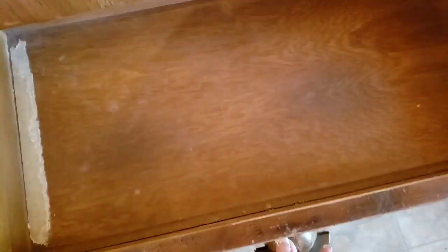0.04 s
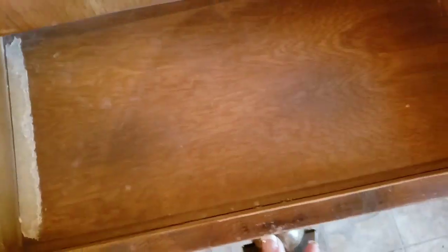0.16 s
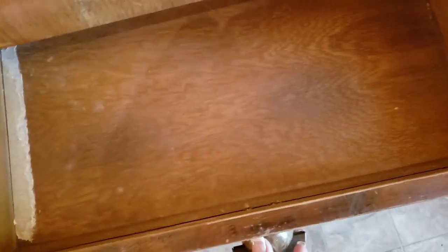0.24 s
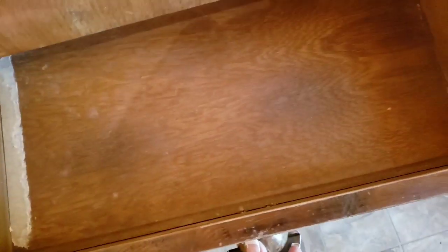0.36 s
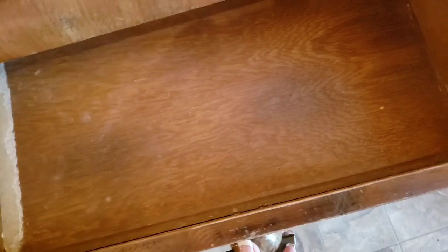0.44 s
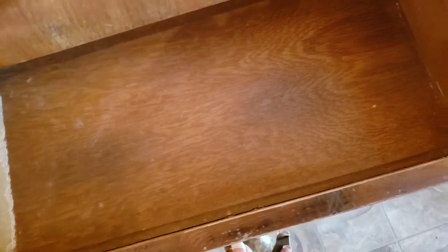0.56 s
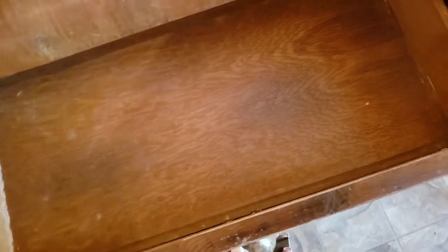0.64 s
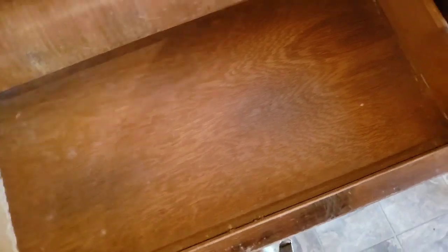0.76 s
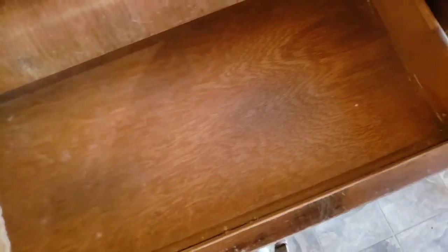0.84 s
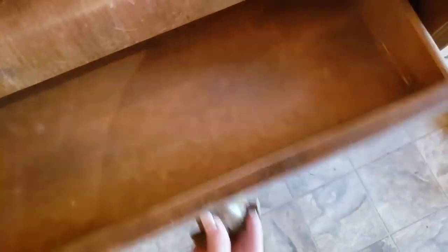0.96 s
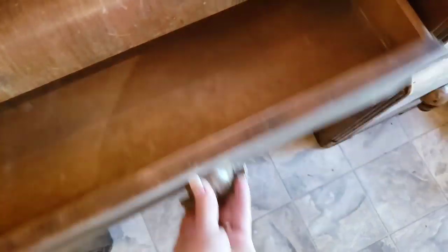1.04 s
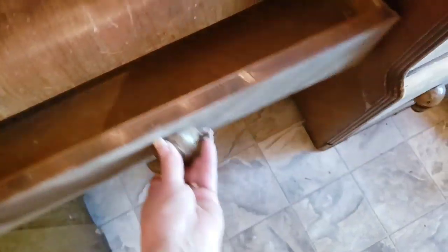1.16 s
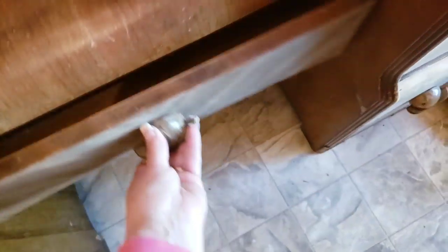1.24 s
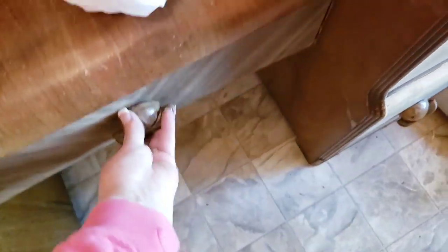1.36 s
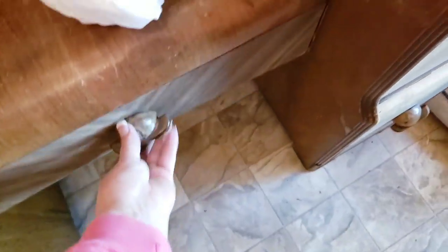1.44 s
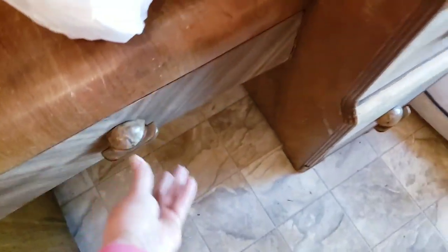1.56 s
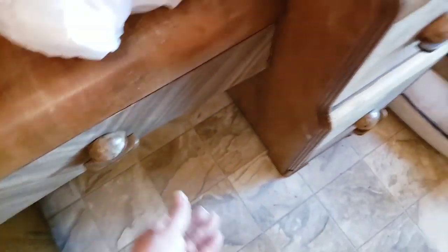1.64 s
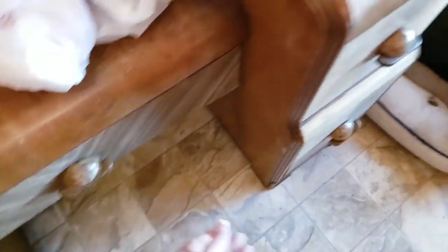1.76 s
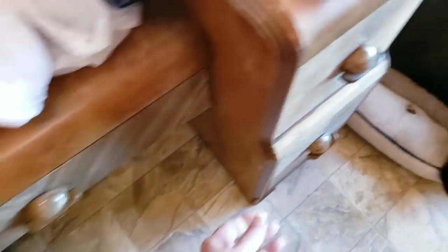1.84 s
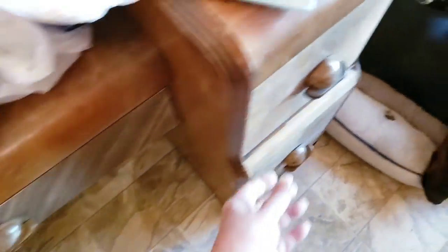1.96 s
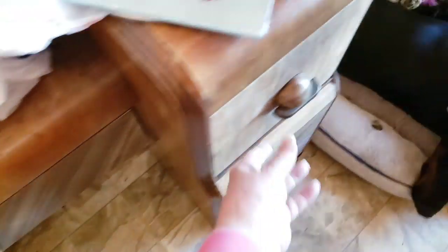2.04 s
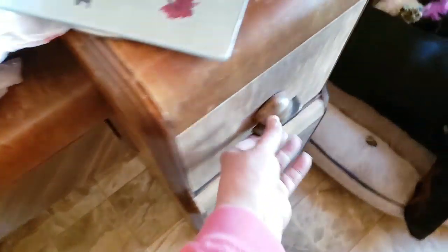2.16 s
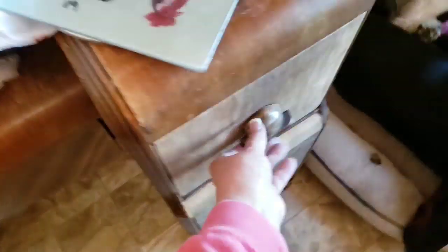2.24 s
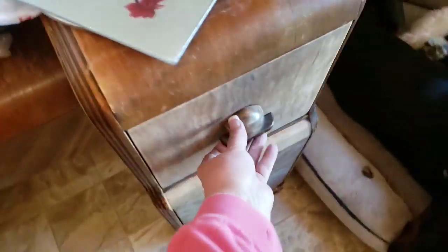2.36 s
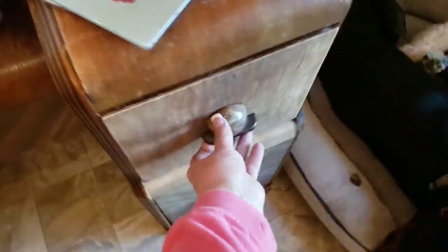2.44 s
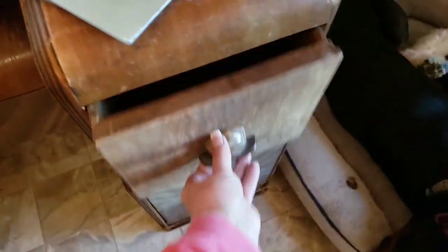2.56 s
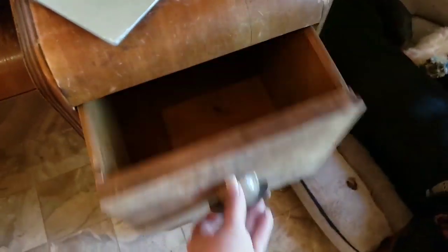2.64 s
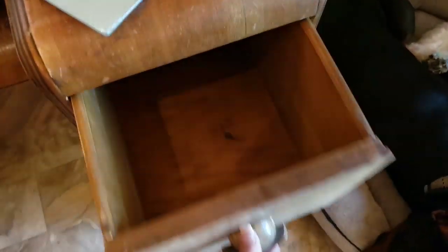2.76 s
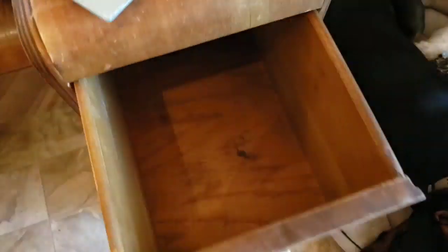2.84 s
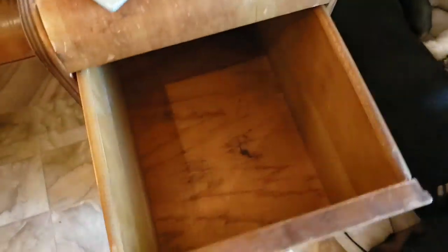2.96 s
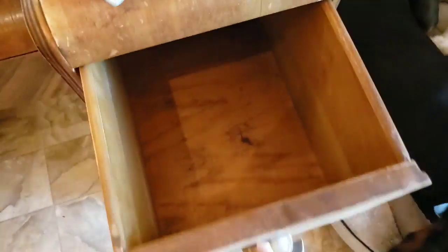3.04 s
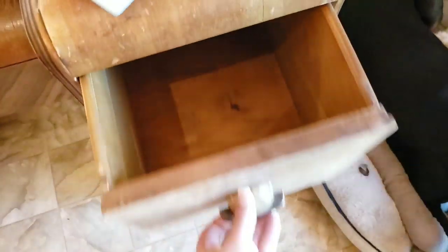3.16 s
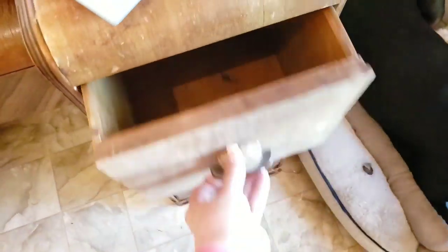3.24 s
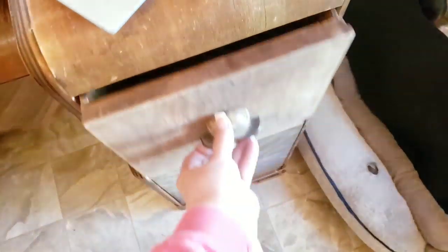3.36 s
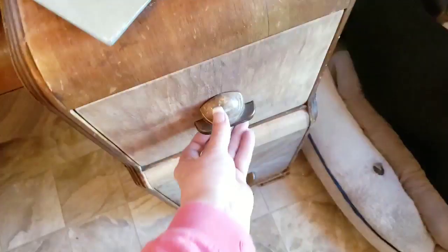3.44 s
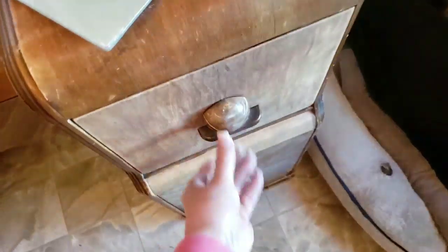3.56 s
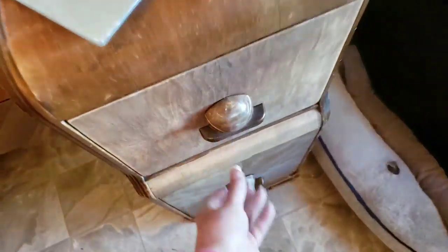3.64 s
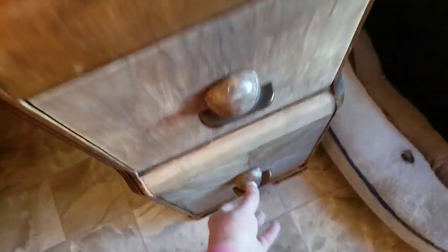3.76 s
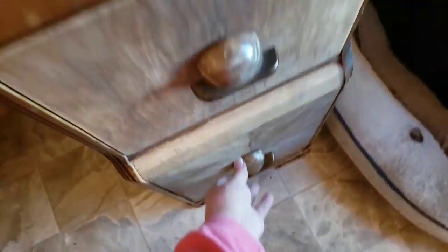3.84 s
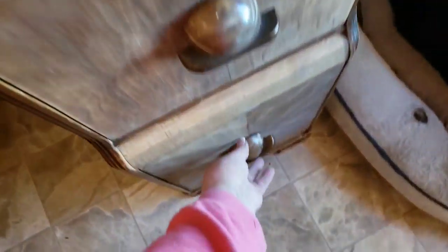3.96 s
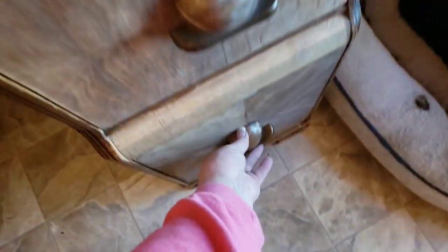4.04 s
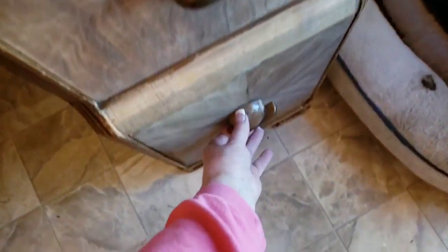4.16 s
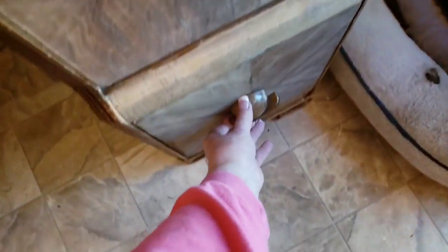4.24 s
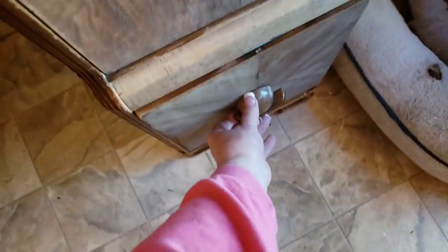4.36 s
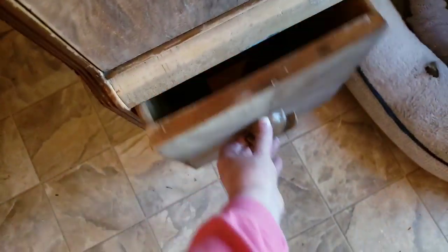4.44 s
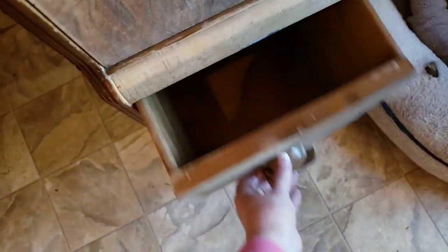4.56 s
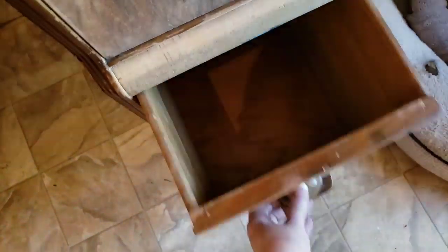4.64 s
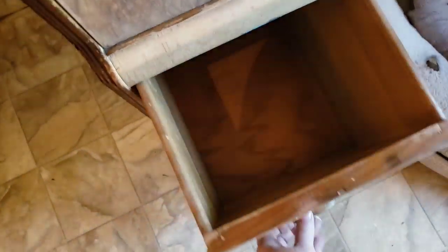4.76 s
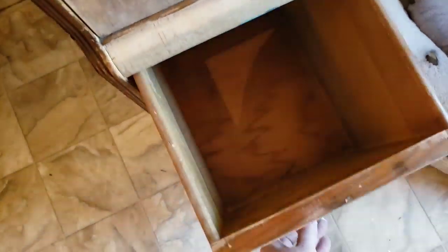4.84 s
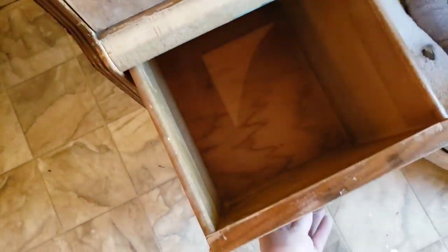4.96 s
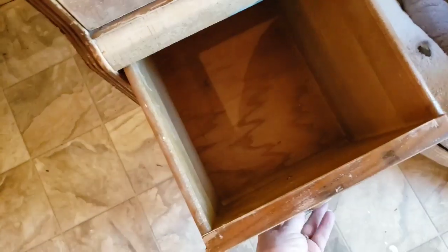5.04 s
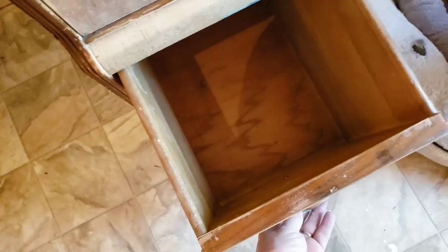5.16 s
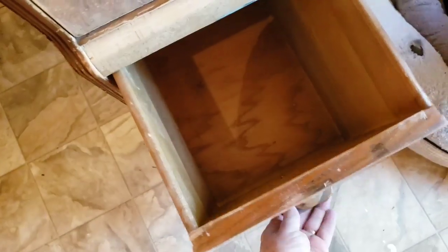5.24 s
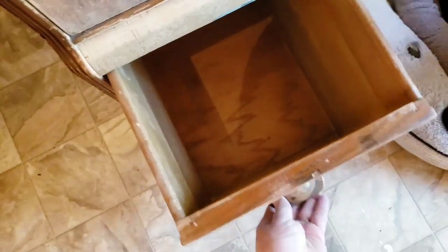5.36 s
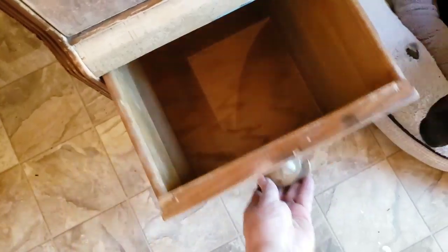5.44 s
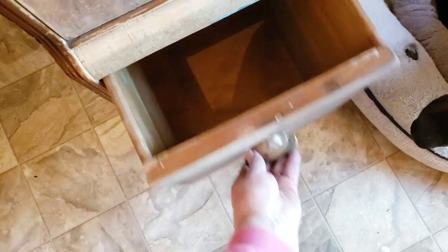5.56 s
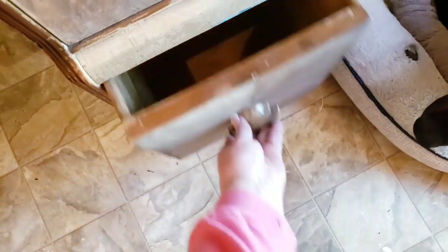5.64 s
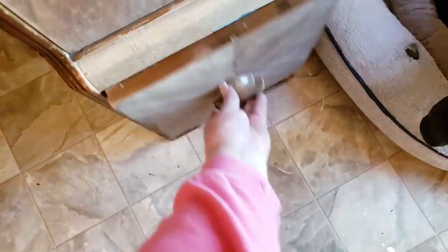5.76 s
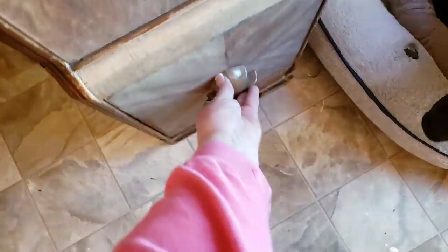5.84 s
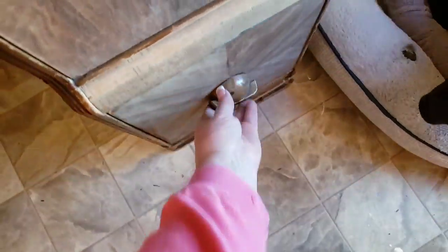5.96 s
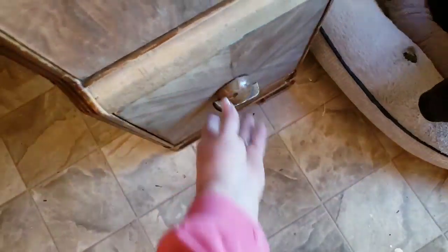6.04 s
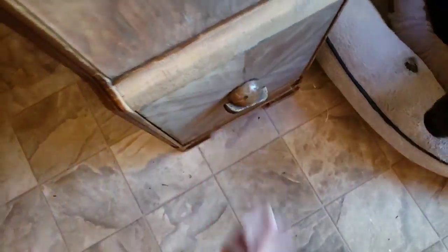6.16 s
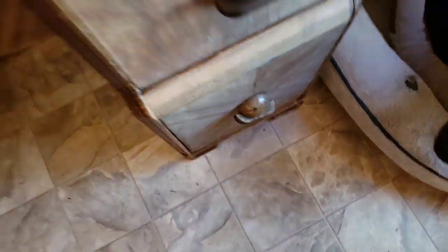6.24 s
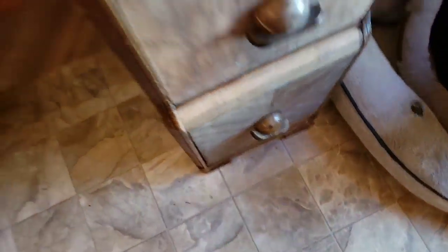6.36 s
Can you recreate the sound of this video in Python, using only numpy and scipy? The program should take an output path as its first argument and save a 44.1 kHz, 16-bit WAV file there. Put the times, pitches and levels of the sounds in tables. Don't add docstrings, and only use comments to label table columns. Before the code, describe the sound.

Heavy wooden thumps and a grinding rub, a brief dropout, then dresser drawers slide open and shut with knocks and clanking metal pulls.

```python
import sys
import numpy as np
from scipy import signal
from scipy.fft import rfft, irfft, next_fast_len
from scipy.io import wavfile
from scipy.ndimage import uniform_filter1d, map_coordinates

SR = 44100
rng = np.random.default_rng(int(sys.argv[2]) if len(sys.argv) > 2 else 0)


def transcribe(u):
    v = np.clip(np.atleast_2d(u).T, -1, 1)
    q = np.round(v * 32767).astype(np.int16)
    wavfile.write(sys.argv[1], SR, q)


def linear_from_db(decibels):
    return 10 ** (np.asarray(decibels, float) / 20)


N = 282636
TOP_HZ = 15750

# [f/Hz, width/Hz, level/dB]
WIDE = [(88.7, 44.3, -1), (126.4, 30, -3.5), (161, 35.8, -2), (213, 56, -2), (280, 14, -4),
        (379.7, 16, -10.5), (528, 32, -19.5), (610.5, 21, -16.5)]
UPPER = [(64.7, 19, -2.5), (101.4, 57, 3.5), (173.5, 47, 3), (240.8, 60, -2), (307.5, 77, -5),
         (429, 21, -19.5), (740, 31, -28)]
LOWER = [(73.5, 9.8, 5.5), (105, 17, 3.5), (133.7, 96, -4), (232, 90.4, -1.5), (285, 18, -0.5),
         (351, 85, -16.5), (507, 29, -20), (803, 21, -18)]
TURNS = [
    0,
    2.1,
    3.95,
    6.5,
]
# [t/s, weight on runners level/dB, sliding speed level/dB]
WIDE_STROKES = [
    [(0, -18, -61.5), (.08, -26, -57.5), (.118, -31, -48), (.135, -20.5, -59), (.24, -25.5, -58.5),
     (.286, -35, -61), (.3, -50.5, -62)],
    [(.435, -43.5, -65.5), (.49, -64.5, -78), (.55, -57, -59.5), (.62, -54.5, -62), (.733, -56.5, -70.5),
     (.8, -48, -66), (.86, -41, -68), (.978, -58.5, -73.5)],
    [(1.0, -57, -62.5), (1.068, -34, -58), (1.14, -27, -61.5), (1.21, -25.5, -45.5), (1.26, -37.5, -58),
     (1.336, -40.5, -62.5), (1.43, -26, -55), (1.47, -38, -52.5), (1.49, -28, -43.5)],
    [(1.58, -25.5, -51), (1.64, -35, -65), (1.708, -51.5, -76), (1.774, -61.5, -70.5), (1.866, -69, -71),
     (1.94, -72, -69), (1.98, -78, -82), (2.14, -85, -78)],
]
UPPER_STROKES = [
    [(2.155, -66, -62.5), (2.297, -64.5, -69), (2.42, -63, -73.5), (2.465, -59.5, -72),
     (2.56, -63.5, -63.5)],
    [(2.6, -30, -58), (2.694, -42, -49.5), (2.812, -37, -42), (2.86, -45, -47.5), (2.9, -35, -45.5),
     (2.996, -34, -46), (3.06, -43.5, -63.5), (3.105, -45.5, -68.5)],
    [(3.125, -32, -58), (3.209, -36.5, -44), (3.3, -26.5, -49.5), (3.395, -30, -46), (3.5, -38.5, -52.5),
     (3.6, -47, -56), (3.65, -23.5, -53), (3.698, -28.5, -70), (3.74, -48, -71)],
    [(3.78, -50.5, -61.5), (3.968, -54.5, -63), (4.015, -55, -62.5), (4.05, -47, -62), (4.238, -51, -63),
     (4.322, -73, -71.5), (4.34, -80, -72)],
]
LOWER_STROKES = [
    [(4.355, -55, -67), (4.437, -44, -58), (4.54, -39.5, -42.5), (4.6, -46, -50.5), (4.75, -37, -42.5),
     (4.85, -36.5, -47), (4.928, -35, -55), (4.972, -27, -47), (5.075, -37.5, -82)],
    [(5.135, -47.5, -57.5), (5.2, -46.5, -56), (5.263, -58, -71), (5.34, -48.5, -71.5)],
    [(5.36, -54, -57.5), (5.415, -35, -43.5), (5.435, -21.5, -63), (5.5, -30.5, -64), (5.6, -35.5, -46.5),
     (5.66, -32.5, -55), (5.734, -30, -41), (5.84, -33.5, -47.5), (5.945, -31.5, -49.5)],
    [(6.03, -26.5, -54), (6.122, -48.5, -60), (6.19, -51.5, -69), (6.28, -59, -56.5), (6.409, -70.5, -64.5)],
]
# [t/s, peak level/dB, main ring f/Hz, ring t60/s, hardness (knock over ring) level/dB]
WIDE_BUMPS = [(0.012, -25, 262.6, 0.083, -10), (0.04, -31.5, 280, 0.12, -6.5),
              (0.136, -7.5, 141.7, 0.11, -11.5), (0.172, -7.5, 207.6, 0.042, -13.5),
              (0.167, -3.5, 129.7, 0.06, -10), (0.189, -5, 144.6, 0.14, -25.5),
              (0.229, -13, 245.7, 0.083, -12), (0.44, -37, 154.5, 0.15, -17.5),
              (0.755, -35.5, 143.6, 0.086, -42), (0.813, -24, 139, 0.12, -16), (1.001, -36, 95, 0.35, -22),
              (1.063, -22, 163.1, 0.91, -15), (1.223, -21.5, 167.3, 0.46, -24.5),
              (1.369, -18.5, 161, 0.051, -4), (1.374, -20.5, 301, 0.26, -2),
              (1.409, -16.5, 145.3, 0.048, -10.5), (1.499, -16.5, 325, 0.045, 7.5),
              (1.501, -14.5, 293.4, 0.085, -21), (1.518, -11, 142.3, 0.18, -2.5)]
UPPER_BUMPS = [(2.156, -49.5, 94, 0.26, -9.5), (2.569, -29.5, 240, 0.46, -4), (2.583, -28, 96, 0.22, -11),
               (2.719, -27.5, 160, 0.22, -43), (2.778, -16.5, 178.4, 0.2, -23),
               (2.817, -21.5, 163.3, 0.59, -38), (3.114, -20.5, 285, 0.22, -6.5),
               (3.141, -21, 282, 0.14, -22), (3.247, -23, 164.5, 0.61, -11.5),
               (3.314, -18, 164.5, 0.27, -40), (3.392, -14.5, 159.5, 0.1, -18.5),
               (3.429, -17.5, 158.9, 0.25, -34), (3.611, -24.5, 157, 0.24, -4),
               (3.641, -14.5, 164, 0.13, -16.5)]
LOWER_BUMPS = [(4.07, -37, 72, 0.065, -27), (4.349, -41, 232, 0.093, -3.5), (4.668, -24, 225, 0.24, -6),
               (4.647, -32.5, 133, 0.14, -24), (4.738, -40, 86.5, 0.15, 11), (4.824, -19.5, 223, 0.15, -8),
               (4.858, -31, 225, 0.19, -11), (4.963, -15, 225.7, 0.099, -13), (4.982, -18, 80.5, 0.17, -25),
               (5.425, -12.5, 238.7, 0.15, -15), (5.513, -17.5, 251.6, 0.19, -26),
               (5.619, -14, 105, 0.31, -5.5), (5.74, -27, 79.6, 0.2, -2), (5.954, -28.5, 181, 0.17, -4),
               (5.967, -17.5, 148.7, 0.064, 0.5), (5.984, -10.5, 70, 0.13, -30),
               (5.975, -7.5, 264, 0.048, -36), (6.14, -35.5, 79, 0.27, -21)]
# [f/Hz, level/dB, t60/s]
FRONTS = [
    [(384, -4, 0.33), (588, -19, 5.0), (1080, -23, 5.0), (1270, -11, 5.0), (1450, -18.5, 0.094),
     (1834, -18, 0.22), (2500, -18, 0.21), (2640, -26.5, 0.096), (2930, -33, 0.22)],
    [(302, 4, 0.15), (700, -9, 0.15), (835, -5, 0.021), (1250, -19, 0.1), (1570, -8, 0.033),
     (2148, -8.5, 0.059), (2300, -31, 0.082), (2550, 0.5, 0.011)],
    [(553, -2.5, 0.036), (746, -7.5, 0.16), (1160, -18, 0.049), (1670, -29, 0.19), (2110, -6, 0.091),
     (2530, -21, 0.19), (2800, -49, 0.13), (3210, -54, 0.121)],
]
# [f/Hz, width/Hz]
BOARDS = [
    [(610, 50), (974, 100), (1400, 65), (2370, 470), (2920, 120), (3360, 150), (3660, 110), (4360, 490)],
    [(790, 31), (1910, 75), (2200, 120), (2400, 160)],
    [(1000, 60), (1310, 490), (1820, 90), (2150, 580), (2880, 47), (4330, 200)],
]
# [f/Hz, level/dB per Hz]
GRIND = [(180, -36), (300, -6.5), (461, -8.5), (1000, -16), (2170, -17.5), (4490, -19.5), (9290, -28),
         (15500, -21.5)]
# [f/Hz, level/dB per Hz]
BLOW = [(180, -15), (300, 4.5), (478, 3), (800, -4), (1100, -10.5), (2480, -26.5), (3600, -40),
        (16000, -54)]
# [t/s, length/s, f/Hz, level/dB]
SQUEAKS = [(1.174, 0.06, 2300, -48.5), (.53, 0.18, 2330, -62), (1.34, 0.072, 1800, -58),
           (1.44, .06, 1600, -45), (1.463, 0.078, 810, -45), (2.794, 0.032, 2000, -51),
           (2.876, 0.053, 1940, -37), (3.2, 0.035, 2400, -49), (3.1, 0.058, 900, -45.5),
           (3.3, 0.034, 2210, -50.5), (2.7, 0.077, 573, -56.5), (4.759, 0.028, 810, -40.5),
           (4.659, .07, 1000, -47.5), (4.735, 0.069, 2430, -48.5), (4.741, 0.027, 3020, -48.5),
           (4.83, 0.048, 1400, -43.5), (4.835, 0.043, 3090, -44), (4.83, 0.038, 4090, -49.5),
           (5.723, 0.027, 870, -35), (5.739, 0.032, 4100, -50.5), (5.753, 0.07, 1900, -48),
           (6.09, .045, 2000, -62.5), (6.28, .08, 1910, -68), (5.35, 0.095, 800, -50.5),
           (5.37, 0.08, 330, -45), (3.355, .06, 550, -47), (3.27, .05, 870, -50), (.6, 0.078, 400, -60),
           (3.848, 0.18, 653, -58)]
# [t/s, peak level/dB, clank f/Hz, wood over clank level/dB, tinkle over clank level/dB]
PULLS = [(2.3497, -51.5, 1550, -22, 9), (2.4489, -37.5, 1510, -21, -11), (2.495, -49.5, 1560, -17, 2),
         (2.5627, -53.5, 1030, -2, 9), (2.9839, -40, 2200, -26.5, 0.5), (3.7183, -37.5, 2160, -5, -7),
         (3.7334, -34, 2040, -18.5, -4.5), (4.0225, -35, 1720, -23, -3), (4.032, -38.5, 1280, -30, 5),
         (4.157, -30, 1410, -15.5, -9.5), (4.1994, -44, 1490, -3.5, -10.5), (4.2423, -40, 1400, -34, -1),
         (4.4943, -26.5, 1570, 0.5, 10.5), (4.523, -26, 1770, -21, -11), (4.551, -46, 1710, 12, 13),
         (5.031, -36.5, 1190, -2, -25), (5.0802, -41.5, 1180, -12.5, 6.5), (5.1034, -34, 1176, 4, -1),
         (5.1827, -41.5, 1220, -14, -7.5), (5.293, -42, 1310, -15, -40.5), (5.472, -52.5, 1300, 11, 16.5),
         (4.067, -41.5, 2120, -0.5, -9.5)]
# [f/Hz, level/dB, t60/s]
PLATE = [(2150, -2, .15), (3950, -3, .05), (4700, -5, .05), (5650, -3, .1), (11900, -8, .05)]
# [f/Hz, level/dB, t60/s]
FRONT_CLACK = [(1490, -10, 0.11), (3700, -15, 0.041), (5150, -26, 0.057)]
UPPER_CLACK = [(2120, 2.5, 0.036), (4450, -33, .08), (5600, -10.5, 0.054), (9577, -10.5, 0.018),
               (11800, -16, 0.12), (13230, -2.5, 0.024)]
GRASP_CLACK = [(1310, 3.5, .06), (1780, -4, .06), (3900, -15, 0.029), (5400, -9, 0.039),
               (8118, -7.5, 0.042), (10300, -11, .04), (12110, -4, .06)]
JERK_CLACK = [(650, -0.5, .06), (1473, -5, 0.064), (2270, -2.5, 0.054), (2670, 1, .022), (3940, -16, 0.12),
              (5055, -10.5, 0.077), (5530, -17, .06), (10270, 4.5, 0.019), (11420, -18.5, 0.033)]
DROP_CLACK = [(550, 1, 0.14), (1200, -5.5, 0.12), (1770, 3, .025), (2200, -3.5, 0.086), (3280, 2, 0.026),
              (3700, -2.5, 0.063), (4240, -8, 0.037), (4740, 0.5, 0.037)]
# [t/s, level/dB, modes]
CLACKS = [
    (2.4491, -36, FRONT_CLACK),
    (3.7183, -49.5, UPPER_CLACK),
    (3.7334, -35.5, UPPER_CLACK),
    (4.023, -44.5, GRASP_CLACK),
    (4.03, -46, GRASP_CLACK),
    (4.4943, -23.5, JERK_CLACK),
    (5.0815, -47.5, DROP_CLACK),
    (5.1033, -34.5, DROP_CLACK),
    (5.1833, -55, DROP_CLACK),
]
# [t/s, level/dB, f/Hz, t60/s]
TICKS = [(.137, -28, 1030, 0.028), (.149, -41.5, 5400, 0.021), (.167, -24.5, 1390, 0.057),
         (.168, -29.5, 2100, 0.044), (.203, -26, 890, 0.036), (.231, -45.5, 5200, 0.018),
         (1.37, -28, 780, 0.065), (1.498, -26.5, 2500, 0.041), (1.499, -21.5, 1790, 0.07),
         (1.513, -29, 1040, 0.068), (2.449, -37, 1520, 0.023), (3.115, -44.5, 2664, .03),
         (3.612, -28.5, 750, 0.038), (4.157, -43, 10900, 0.0089), (4.218, -47.5, 3400, 0.012),
         (4.243, -45.5, 1450, 0.015), (4.485, -31.5, 790, 0.034), (5.2944, -51, 1120, .05),
         (5.472, -39.5, 4430, 0.018), (5.619, -31, 600, 0.034), (5.619, -37.5, 6000, 0.036),
         (5.624, -44.5, 10400, 0.022), (7, -38, 2180, .02), (5.953, -31, 1450, .04),
         (5.968, -21.5, 1650, .025), (5.969, -38, 7080, 0.029), (6.149, -47, 1200, 0.027),
         (6.149, -46, 680, 0.17), (6.286, -57, 1200, .037)]
# [t/s, length/s, level/dB]
RUSTLES = [
    (.055, .08, -59.5),
    (4.034, 0.24, -66.5),
    (6.197, .16, -61.5),
]
# [f/Hz, t60/s]
ROOM = [(100, 0.37), (500, 0.26), (2000, 0.085), (8000, 0.067), (15000, 0.1)]
# [f/Hz, left minus right level/dB]
PORTS = [(60, 2), (200, -1), (500, -1), (1290, -5.5), (2380, -10.5), (4400, -10.5), (8120, -2.5),
         (15000, -3.5)]
# [f/Hz, left lead/rad]
LEAD = [(0, 0), (500, .3), (1200, 1.2), (2200, 1.5), (16000, 1.7)]
# [t/s, extra lag of the left port/ms]
TURNING = [
    (.8, -0.0012),
    (1.05, -0.2),
    (1.9, -0.19),
    (2.1, .04),
]
# [start t/s, end t/s]
GAP = (.2985, 0.435)


def unit(x):
    return x / np.sqrt(np.mean(x ** 2) + 1e-20)


def decay(t, t60):
    return linear_from_db(-60 * t / t60)


def noise(*shape):
    return rng.standard_normal(shape)


def along(points, hz):
    f, v = np.transpose(points)
    return np.interp(np.log(hz + 1), np.log(f + 1), v)


def filtered(x, response):
    n = x.shape[-1]
    m = next_fast_len(n + 8192)
    return irfft(rfft(x, m) * response(np.fft.rfftfreq(m, 1 / SR)), m)[..., :n]


def band(lo_hz, hi_hz):
    return lambda f: 1 / np.sqrt((1 + (lo_hz / (f + 1)) ** 6) * (1 + (f / hi_hz) ** 6))


def panels(modes):
    def response(f):
        total = 0
        for k, (centre, width, db) in enumerate(modes):
            damping = 1j * f * width
            total = total + (-1) ** k * linear_from_db(db) * damping / (centre * centre - f * f + damping)
        return total
    return response


def wobble(rate):
    return map_coordinates(noise(N // 100), [np.arange(N) * rate / SR])


def slips(rate, spread_db):
    moment, sign, size = rng.random((3, N))
    return (moment < rate / SR) * np.sign(sign - .5) * linear_from_db(-spread_db * np.log(size + 0.013))


def add_at(out, s, sound):
    out[round(s * SR):][:len(sound)] += sound


def in_hand(s):
    return np.searchsorted(TURNS, s) - 1


def drawers():
    t = np.arange(N) / SR
    return [(m, (t >= a) & (t < b)) for m, a, b in zip((WIDE, UPPER, LOWER), TURNS, TURNS[1:])]


def per_drawer(levels_db):
    return sum(db * on for db, (_, on) in zip(levels_db, drawers()))


def handling():
    s, *columns = np.concatenate(WIDE_STROKES + UPPER_STROKES + LOWER_STROKES).T
    return [np.interp(np.arange(N) / SR, s, column) for column in columns]


def hush():
    weight_db = handling()[0]
    grip = linear_from_db(-70)
    level = linear_from_db(0.91 * weight_db + per_drawer((-33.5, -18.5, -14))) + grip
    level = level * linear_from_db(3.6 * wobble(1.6))
    rumble = level * unit(filtered(noise(N), band(25, 77)))
    hiss = linear_from_db(-81.5) * filtered(noise(2, N), band(300, 20000))
    return rumble + hiss


def room(x):
    out, hop = np.zeros((2, N + 2 * SR)), SR // 3
    colour = [(100, -20.0), (300, -12.5), (700, -4.0), (1500, -5.0), (8000, -3.0)]  # f/Hz, level/dB
    padded = np.pad(x, (hop, 2 * hop))
    for i in range(0, N + hop, hop):
        hz, t, z = signal.stft(noise(2, SR // 3), SR, nperseg=256)
        fading = decay(t, along(ROOM, hz)[:, None]) + decay(t, .04)
        tail = signal.istft(z * fading, SR, nperseg=256)[1]
        piece = padded[i:i + 2 * hop] * np.hanning(2 * hop)
        answer = signal.fftconvolve(piece[None], tail / np.linalg.norm(tail[0]), axes=1)
        out[:, i + 60:][:, :answer.shape[1]] += answer
    return filtered(out[:, hop:hop + N], lambda f: linear_from_db(along(colour, f)))


def rustles():
    t = np.arange(N) / SR
    level = sum(linear_from_db(db) * np.sin(np.pi * np.clip((t - s) / length, 0, 1)) for s, length, db in RUSTLES)
    return level * linear_from_db(2.5 * wobble(36)) * unit(filtered(noise(N), band(7000, 14000)))


def squeaks():
    out = np.zeros(N)
    for s, length, hz, db in SQUEAKS:
        n = round(length * SR)
        rough = noise(n) * np.repeat(linear_from_db(rng.normal(0, 3.7, n)), 128)[:n]
        chatter = unit(filtered(rough, panels([(hz, .06 * hz, 0), (hz, 700, -13)])))
        out[round(s * SR):][:n] += linear_from_db(db) * np.hanning(n) ** 0.84 * chatter
    return out


def clacks():
    out, t = np.zeros(N + SR), np.arange(SR // 7) / SR
    rise = 1 - np.exp(-t / .0004)
    for s, db, modes in CLACKS:
        ring = np.zeros(len(t))
        for hz, level, t60 in modes:
            tone = decay(t, t60) * np.sin(2 * np.pi * hz * t)
            rattle = unit(filtered(noise(len(t)), panels([(hz, 0.3 * hz, 0)])))
            ring += linear_from_db(level) * (tone + 0.49 * decay(t, 0.014) * rattle)
        add_at(out, s, linear_from_db(db) * ring * rise)
    for s, db, hz, t60 in TICKS:
        resonance = panels([(hz, 0.009 * hz ** 1.5, 0)])
        rattle = unit(filtered(noise(len(t)), lambda f: resonance(f) ** 2))
        tick = np.sin(2 * np.pi * hz * t) + 1.2 * rattle
        add_at(out, s, linear_from_db(db) * decay(t, t60) * tick * rise)
    return out[:N]


def pulls():
    out, t = np.zeros(N + SR), np.arange(SR // 6) / SR
    rise = 1 - np.exp(-t / .0004)
    for s, db, hz, wood_db, bright_db in PULLS:
        clank = sum(np.sin(2 * np.pi * hz * k * t) for k in rng.normal(1, 0.04, size=3))
        clank *= 0.48 * decay(t, 0.032)
        metal = unit(filtered(noise(len(t)), panels([(hz, 0.082 * hz, 0)])))
        clank += 0.3 * metal * decay(t, 0.031 * (hz / 1000) ** 2)
        tick = unit(filtered(noise(len(t)), band(920, 3800)))
        clank += (0.4 * decay(t, 0.0043) + 0.057 * decay(t, 0.039)) * tick

        front = panels([(627, 140, 7.0), (822, 120, -4.5)])
        knock = decay(t, 0.19) * unit(filtered(noise(len(t)), front))

        high_hz = 4130 * np.exp(rng.normal(0, 0.04))
        tinkle = 0.77 * np.sin(2 * np.pi * high_hz * t) + np.sin(2 * np.pi * 4.8 * high_hz * t)
        tinkle *= decay(t, 0.0053)
        for c, level, t60 in PLATE:
            tone = np.sin(2 * np.pi * c * rng.normal(1, 0.0079) * t)
            tinkle += 0.043 * linear_from_db(level + rng.normal(0, 2.4)) * decay(t, t60) * tone
        spray = filtered(noise(len(t)), lambda f: band(1700, 20000)(f) * (.5 + band(1700, 5500)(f)))
        tinkle += (0.56 * decay(t, 0.022) + 0.12 * decay(t, 0.19)) * spray

        tap = linear_from_db(db - 2.5) * clank + linear_from_db(db + wood_db - 5) * knock + linear_from_db(db + bright_db - 1.5) * tinkle
        add_at(out, s, tap * rise)
    return out[:N]


def blow_noise(n, lo_hz, hi_hz):
    return unit(filtered(noise(n), lambda f: linear_from_db(along(BLOW, f)) * band(lo_hz, hi_hz)(f)))


def panel_ring(t, s, hz, t60, hard_db):
    ring = np.sin(2 * np.pi * hz * t) * decay(t, t60)
    for c, w, level in (WIDE, UPPER, LOWER)[in_hand(s)]:
        dull_db = 0.11 * min(hard_db, 0) * max(np.log2(c / hz), 0)
        mode_amp = linear_from_db(level + dull_db + rng.normal(0, 4.0))
        ring += 0.34 * mode_amp * decay(t, t60) * np.sin(2 * np.pi * c * t + rng.normal(0, 1.0))
    ring *= -(1 - np.exp(-t / (0.002 * linear_from_db(-.2 * hard_db))))
    ring = np.pad(ring, (round(.002 * SR), 0))[:len(t)]
    return ring / np.abs(ring).max()


def front_knock(t, s, knock_db, hard_db):
    knock = blow_noise(len(t), 330, 950) * (0.37 * decay(t, 0.045) + 0.44 * decay(t, 0.27))
    for c, level, t60 in FRONTS[in_hand(s)]:
        tone = decay(t, min(t60, .1)) * np.sin(2 * np.pi * c * t)
        knock += linear_from_db(-5.5 + level + rng.normal(0, 2.1)) * tone
    upper_wood = blow_noise(len(t), 950, 2800) * (0.45 * decay(t, 0.047) + 0.15 * decay(t, 0.3))
    knock += linear_from_db(0.28 * (knock_db + 16.5)) * upper_wood
    rise_s = 0.00072 * linear_from_db(-hard_db)
    return knock * (1 - np.exp(-t / rise_s))


def bumps():
    out, t = np.zeros(N + SR), np.arange(SR // 4) / SR
    for s, db, hz, t60, hard_db in WIDE_BUMPS + UPPER_BUMPS + LOWER_BUMPS:
        knock_db = db + hard_db
        crack_db = 1.31 * knock_db - 8
        ring = panel_ring(t, s, hz, t60, hard_db)
        knock = front_knock(t, s, knock_db, hard_db)
        crack = blow_noise(len(t), 2800, 20000) * (decay(t, 0.008) + 0.3 * decay(t, 0.11))
        crack *= 1 - np.exp(-t / 0.0011)
        add_at(out, s, linear_from_db(db) * ring + linear_from_db(knock_db - 2.5) * knock + linear_from_db(crack_db + 1.5) * crack)
    return out[:N]


def drumming(judder):
    weight_db = handling()[0]
    kicks = unit(slips(rate=130, spread_db=2)) + .9 * noise(N)
    drum = sum(on * unit(filtered(kicks, panels(modes))) for modes, on in drawers())
    return linear_from_db(weight_db - 3.0 + 1.9 * judder) * drum


def grinding(judder):
    weight_db, speed_db = handling()
    grind_db = 0.34 * weight_db + (1 - 0.34) * speed_db - 1
    dust_db = 0.74 * speed_db + per_drawer((-18.5, -21.5, -20))
    grit = unit(slips(rate=500, spread_db=2.2)) + 1.7 * noise(2, N)
    grit = grit * linear_from_db(.9 * judder + .9 * wobble(70))

    hz, s, z = signal.stft(grit, SR, nperseg=1024)
    field = uniform_filter1d(noise(*z.shape[1:]), size=3, axis=0)
    field = uniform_filter1d(field, size=4, axis=1)
    depth_db = along([(300, 4.6), (1500, 2.6), (4000, 1.5), (9000, 0.74)], hz)[:, None]
    travel = np.interp(s * SR, np.arange(N), unit(uniform_filter1d(judder, size=SR // 8)))
    moved_hz = hz[:, None] * np.exp(0.027 * travel)
    for board, start, end in zip(BOARDS, TURNS, TURNS[1:]):
        now = (s >= start) & (s < end)
        tones = panels([(c, w, 0) for c, w in board])(moved_hz[:, now])
        z[..., now] *= 1 + 0.7 * np.abs(tones)
    grit = signal.istft(z * linear_from_db(unit(field) * depth_db), nperseg=1024)[1][:, :N]
    grit = filtered(grit, lambda f: linear_from_db(along(GRIND, f)))

    grind = linear_from_db(grind_db - 5.5) * unit(filtered(grit, band(400, 1500)))
    scrape = linear_from_db(speed_db - 5.5) * unit(filtered(grit, band(1500, 6000)))
    dust = linear_from_db(dust_db - 5.5) * unit(filtered(grit, band(6000, 20000)))
    return grind + scrape + dust


def rubbing():
    judder = wobble(24)
    return drumming(judder) + grinding(judder)


def scene():
    wood = rubbing() + squeaks() + bumps()
    metal = pulls() + rustles() + clacks()
    t = np.arange(N) / SR
    wood = np.where(t < TURNS[1], filtered(wood, band(62, TOP_HZ)), wood)

    lead = lambda f: np.exp(1j * np.interp(f, *np.transpose(LEAD)) * [[.5], [-.5]])
    left, right = filtered(wood + metal, lead)
    shift = np.interp(t, *np.transpose(TURNING)) * SR / 2000
    direct = [map_coordinates(left, [np.arange(N) - shift]), map_coordinates(right, [np.arange(N) + shift])]
    return direct + room(wood[1] + linear_from_db(-7) * metal) + hush()


def band_limit(x):
    return signal.sosfilt(signal.butter(12, 17010, fs=SR, output="sos"), x)


def record(dry):
    def ports(f):
        return linear_from_db(along(PORTS, f) * [[.5], [-.5]]) * band(45, 30000)(f) * (f < TOP_HZ)
    heard = filtered(dry, ports)
    t = np.arange(N) / SR
    sounding = np.clip(np.maximum(GAP[0] - t, t - GAP[1]) / 0.00067, 0, 1)
    return band_limit(heard * sounding)


dry = scene()
out = record(dry)
transcribe(out)
```